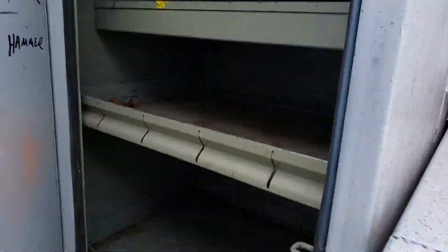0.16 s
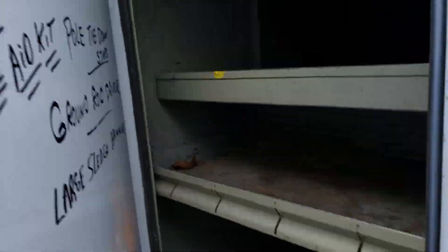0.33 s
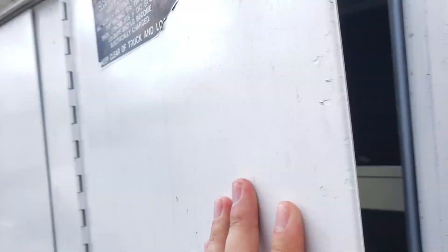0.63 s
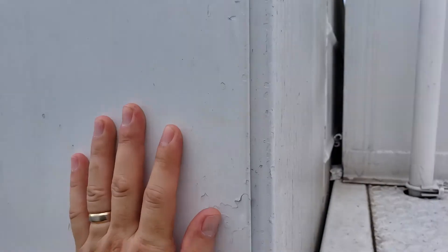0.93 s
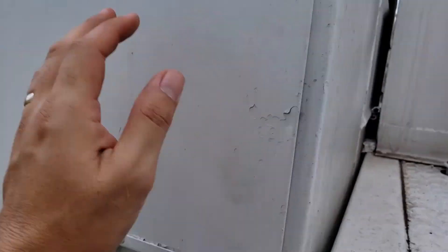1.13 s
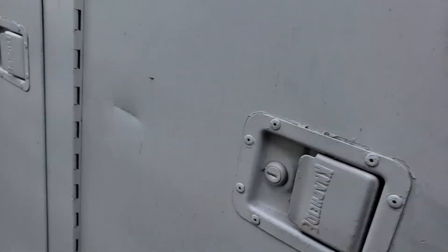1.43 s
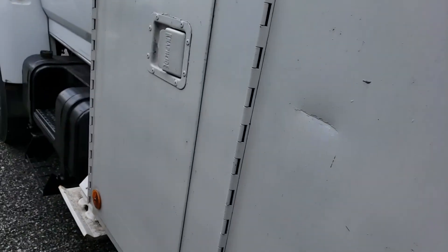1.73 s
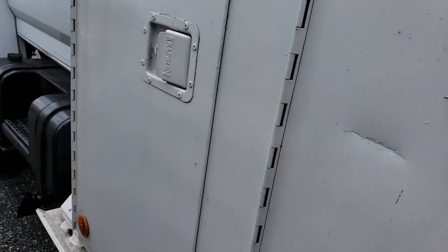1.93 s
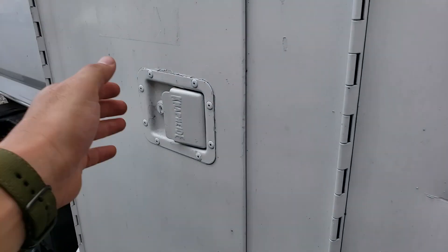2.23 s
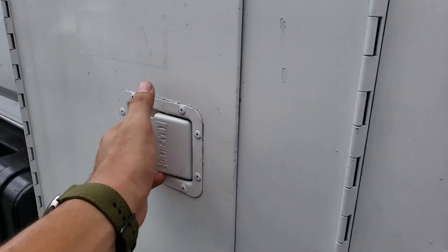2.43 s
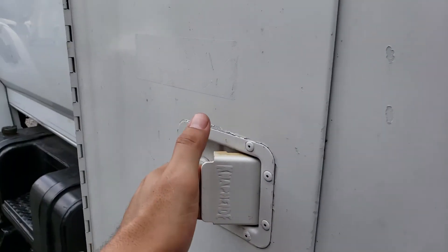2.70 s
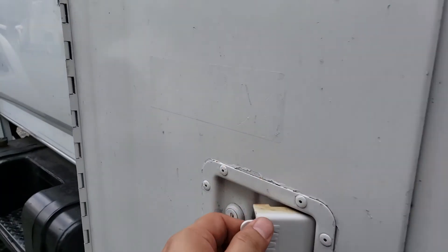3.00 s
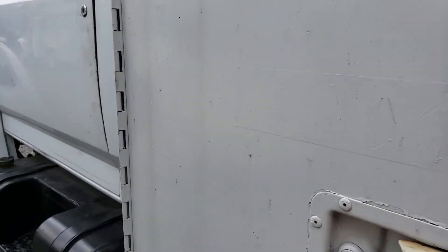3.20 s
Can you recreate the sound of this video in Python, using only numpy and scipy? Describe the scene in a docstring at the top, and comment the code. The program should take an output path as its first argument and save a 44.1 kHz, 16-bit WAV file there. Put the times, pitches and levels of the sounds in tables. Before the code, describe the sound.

Metal door on a service truck creaks shut with a hard clattering slam, followed by handle clicks

```python
"""An engine idles some way off as a steel compartment door on a service truck is pushed shut in an open yard.
Its long hinge groans and scrapes (stick-slip tones, slip noise), the panel drones (resonated noise), the latch
bolt squeaks onto the striker (jittered tones) and the door slams with a rattle (decaying noise bands, modes).
A hand slides off the paint (shaped noise), then ticks, works and taps the paddle handle of the next door, whose
bolt grates (resonated slips) and whose latch snaps free (strikes, decaying modes)."""
import sys
import numpy as np
from scipy import signal
from scipy.fft import rfft, irfft
from scipy.io import wavfile

SR = 44100
rng = np.random.default_rng(int(sys.argv[2]) if len(sys.argv) > 2 else 0)


def dump(signal):
    """Clip the signal to [-1, 1] and save it as 16-bit WAV at the path in sys.argv[1]."""
    limited = np.clip(np.atleast_2d(signal).T, -1, 1)
    pcm = np.round(limited * 32767).astype(np.int16)
    wavfile.write(sys.argv[1], SR, pcm)


N = 147735
T = np.arange(N) / SR
TAU = 2 * np.pi

# ring of the latch steel: (frequency [Hz], relative density [dB per Hz], t60 [s])
CLASH_RING = [(1300, -9.5, 0.35), (2580, -7.5, 0.22), (5800, -4.5, .14), (8200, -9.5, 0.087),
              (12000, -3.5, 0.089)]


def from_db(db):
    """Decibels to gain."""
    return 10 ** (np.asarray(db) / 20)


def rms_one(x):
    """Scale to rms 1."""
    return x / np.sqrt(np.mean(x ** 2) + 1e-20)


def in_time(rows, axis=1):
    """One column of a curve at every sample."""
    rows = np.array(rows)
    return np.interp(T, rows[:, 0], rows[:, axis])


def level(rows, axis=1):
    """Gain along a dB curve, falling at 500 dB/s outside it."""
    times_s = [row[0] for row in rows]
    outside_s = np.abs(T - np.clip(T, min(times_s), max(times_s)))
    return from_db(np.maximum(in_time(rows, axis=axis) - 500 * outside_s, -200))


def at_hz(rows, hz, axis=1):
    """One column of a spectrum, interpolated over log frequency."""
    rows = np.array(rows)
    return np.interp(np.log(hz + 1e-9), np.log(rows[:, 0]), rows[:, axis])


def drift(rate_hz):
    """Slow random wander of rms 1: white noise through a double one-pole low-pass."""
    r = np.exp(-TAU * rate_hz / SR)
    white = rng.standard_normal(N + SR)
    settled = signal.lfilter([1], [1, -2 * r, r * r], white)[SR:]
    return rms_one(settled)


def wavering(hz, jitter, rate_hz):
    """Phase of a vibration whose pitch wanders by a share of itself."""
    return TAU * np.cumsum(hz + hz * jitter * drift(rate_hz)) / SR


def noise_pair():
    """Two unrelated white noises."""
    return rng.standard_normal((2, N))


def spread(pair):
    """Two unrelated signals become left and right, alike in the bass and unlike in the treble."""
    # stereo image: (frequency [Hz], likeness of left and right, left minus right [dB])
    stereo_image = [(270, 0.9, 0), (1129, 0, 2.5), (2600, 0.079, -3.5)]
    size = pair.shape[1]
    hz = np.arange(size // 2 + 1) * SR / size
    sides = np.array([[1], [-1]])
    alike = np.clip(at_hz(stereo_image, hz), -1, 1)
    mid, side = rfft(pair)
    left_right = np.sqrt(1 + alike) * mid + np.sqrt(1 - alike) * side * sides
    balance = from_db(sides * at_hz(stereo_image, hz, axis=2) / 2)
    return irfft(left_right * balance, size)


def coloured(pair, colour):
    """Shape a steady excitation, falling away below its first point; stereo, rms 1."""
    hz = np.arange(N // 2 + 1) * SR / N
    low_cut = np.minimum(hz / colour[0][0], 1) ** 2
    shaped = irfft(rfft(pair) * from_db(at_hz(colour, hz)) * low_cut, N)
    return rms_one(spread(shaped))


def resonate(x, modes):
    """Parallel two-pole resonances; white noise of rms 1 leaves each at its dB."""
    out = 0
    for hz, width_hz, db in modes:
        r = np.exp(-np.pi * width_hz / SR)
        poles = [1, -2 * r * np.cos(TAU * hz / SR), r * r]
        gain = from_db(db) * np.sqrt((1 - r * r) / 2)
        out = out + gain * signal.lfilter([1, 0, -1], poles, x + 1e-18)
    return out


def slips():
    """Dense tiny slips of uneven size, in two channels of unrelated sizes."""
    slips_per_s = 2200
    return rms_one(noise_pair() * (rng.random(N) < slips_per_s / SR))


def strike(s, db, ring, crack_db=0):
    """A blow on steel: crowded modes, as third-octave noise bands that each die at their own rate."""
    crack_t60_s = 0.029
    t = T[:SR * 3 // 4]
    lowest_hz = ring[0][0]
    centres_hz = 31.25 * 2 ** (np.arange(27) / 3)
    centres_hz = centres_hz[centres_hz > lowest_hz / 2]
    low_cut = np.minimum(centres_hz / lowest_hz, 1) ** 2
    # density times root bandwidth
    gains = from_db(at_hz(ring, centres_hz)) * np.sqrt(centres_hz) * low_cut
    gains = rms_one(gains) / np.sqrt(len(centres_hz))
    # two noises, used by alternate bands
    white = spread(rng.standard_normal((2, 2 * len(t)))).reshape(2, 2, -1)
    out = 0
    for k, (hz, gain) in enumerate(zip(centres_hz, gains)):
        sos = signal.butter(2, [hz * .89, hz * 1.12], "band", fs=SR, output="sos")
        band = rms_one(signal.sosfilt(sos, white[:, k % 2]))
        out = out + gain * band * from_db(-60 * t / at_hz(ring, hz, axis=2))
    # the first instant stands crack_db above the ring
    out = out * (1 + (from_db(crack_db) - 1) * from_db(-60 * t / crack_t60_s))
    return from_db(db - crack_db) * np.pad(out, ((0, 0), (int(s * SR), N)))[:, :N]


def ring_modes(hits, modes):
    """Each hit sets the clear modes of a part ringing; they swell over about one cycle."""
    out = np.zeros((2, N))
    for s, db in hits:
        t = T[T >= s] - s
        for hz, mode_db, t60_s in modes:
            swell = -np.expm1(-hz * t)
            fade = from_db(db + mode_db - 60 * t / t60_s) * swell
            out[:, T >= s] += fade * np.sin(TAU * (hz * t + rng.random((2, 1))))
    return spread(out) / np.sqrt(2)


def engine_hum():
    """Low sines of an idling engine, wavering in pitch."""
    # (frequency [Hz], relative level [dB])
    engine_lines = [(55.5, 1), (108, 1.5)]
    return sum(from_db(db) * np.sin(wavering(hz, 0.0379, 7.85)) for hz, db in engine_lines)


def yard():
    """Outdoor rumble as shaped noise, with the engine hum following its level."""
    # (frequency [Hz], relative level [dB])
    yard_colour = [(50, -1), (110, -4.5), (300, -18), (1200, -36.5), (2100, -36.5), (6000, -48),
                   (16000, -55)]
    # (time [s], level [dB])
    yard_level = [(1.9, -43), (2.85, -40.5), (3.2, -35.5)]
    rumble = coloured(noise_pair(), yard_colour)
    return from_db(in_time(yard_level)) * (rumble + from_db(-2.5) * engine_hum())


def panel_drone():
    """The swinging panel drones: noise through its resonances."""
    # (time [s], level [dB])
    drone_level = [(0, -34.5), (.35, -23.5), (.62, -35.5), (.8, -25.5)]
    # (frequency [Hz], width [Hz], relative level [dB])
    drone_modes = [(62.6, 27, 8.2), (111, 67, 15), (238.5, 18, 8.3)]
    return level(drone_level) * rms_one(spread(resonate(noise_pair(), drone_modes)))


def hinge_scrape():
    """Dry friction in the hinge: tiny slips, heard directly and through the ring of steel."""
    # (time [s], level [dB])
    scrape_level = [(0, -42.5), (.245, -45), (.265, -19), (.312, -23), (.365, -28.5), (.452, -18.5),
                    (.49, -22), (.535, -36), (.62, -56), (.76, -46)]
    # (frequency [Hz], relative level [dB])
    scrape_colour = [(600, 10), (1700, -8.5), (3000, 2.5), (4200, -7), (7500, -1), (9500, -7),
                     (13500, -3.5), (16000, -7)]
    grind = slips()
    ringing = signal.fftconvolve(grind, strike(0, 0, CLASH_RING), axes=1)[:, :N]
    return level(scrape_level) * coloured(grind + rms_one(ringing), scrape_colour)


def hinge_groan():
    """Two knuckles of the hinge stick and slip at unsteady rates; the lower beats against the other."""
    # stick-slip rate: (time [s], frequency [Hz])
    groan_pitch = [(.31, 250), (.4, 259.7), (.54, 267.3)]
    # (time [s], fundamental level [dB], overtone level [dB])
    groan_level = [(.235, -23.5, -63), (.305, -12, -22), (.355, -17.5, -31), (.425, -25, -24.5),
                   (.495, -13, -26), (.548, -20.5, -36), (.585, -39.5, -35.5)]
    # multiples 2 to 5: relative level [dB]
    overtones_db = [1.5, -11.5, -18, -17]
    # second knuckle: (time [s], level [dB])
    judder_level = [(.21, -47), (.268, -16), (.335, -37), (.39, -11), (.435, -24.5), (.53, -26.5)]
    jitter, flutter_db = 0.025, 3
    judder_hz, judder_octave_db = 233, -7

    phase = wavering(in_time(groan_pitch), jitter, 100)
    low = level(groan_level) * np.sin(phase)
    high = 0
    for k, db in enumerate(overtones_db, 2):
        gain = from_db(db + flutter_db * drift(48))
        high = high + gain * np.sin(k * phase + TAU * rng.random())
    second = wavering(judder_hz, jitter, 92)
    octave_gain = from_db(judder_octave_db + flutter_db * drift(35))
    judder = level(judder_level) * (np.sin(second) + octave_gain * np.sin(2 * second))
    return np.sqrt(2) * (low + level(groan_level, axis=2) * high + judder)


def squeaks():
    """Steel rubs on steel at hinge, striker and handle; overtones grow with the level."""
    # (start [s], length [s], frequency [Hz], fundamental level [dB])
    squeak_events = [(-0.02, .23, 2150, -46.5), (0.195, .08, 1094, -36.5), (0.688, 0.035, 3260, -40),
                     (0.708, 0.05, 3760, -39), (0.74, 0.021, 3864, -33), (2.859, 0.027, 4090, -58)]
    harsh_db = -31.5  # level at which overtones match the fundamental
    out = 0
    for s, length_s, hz, db in squeak_events:
        progress = (np.clip(T, s, s + length_s) - s) / length_s
        gain = from_db(db) * np.sqrt(np.abs(np.sin(np.pi * progress)))
        phase = np.array([wavering(hz, .025, 400) for _ in range(2)])
        harshness = np.minimum(gain / from_db(harsh_db), 1) ** 2
        overtones = harshness * (np.sin(2 * phase) + np.sin(3 * phase))
        out = out + gain * (np.sin(phase) + overtones)
    return spread(out)


def slam():
    """Latch and door edge hit the frame in a quick run of contacts."""
    # (time [s], clash level [dB], body level [dB])
    contacts = [(0.7607, -16, -24), (0.767, -22, -12), (0.7757, -16.5, -11), (.789, -19.5, -15.5),
                (.802, -16, -13.5)]
    # hollow door: (frequency [Hz], relative density [dB per Hz], t60 [s])
    body_ring = [(50, 8, 0.34), (130, 10, 0.32), (520, -5.5, 0.39), (1630, -4.5, 0.18), (2660, -30.5, 0.27)]
    out = 0
    for s, clash_db, body_db in contacts:
        out = out + strike(s, clash_db, CLASH_RING) + strike(s, body_db, body_ring)
    return out


def panel_booms():
    """A panel's modes boom as it hits the frame, rebounds, is unlatched and springs off its seal."""
    # (time [s], level [dB])
    booms = [(.772, -12), (.81, -10), (2.92, -27.5), (2.968, -32.5)]
    # (frequency [Hz], relative level [dB], t60 [s])
    panel_modes = [(102, 5.5, 0.067), (168.8, -7, 0.39), (264.5, 0.5, 0.19), (473.6, -10, 0.24),
                   (1580, -27, .15)]
    return ring_modes(booms, panel_modes)


def palm():
    """Skin hisses softly over painted steel: shaped noise."""
    # (time [s], level [dB])
    palm_level = [(.95, -64), (1.36, -53.5), (1.7, -68)]
    # (frequency [Hz], relative level [dB])
    palm_colour = [(5200, 7.5), (8500, 0), (12000, 4.5), (16000, -4)]
    return level(palm_level) * coloured(noise_pair(), palm_colour)


def finger_ticks():
    """Fingers tick on the paddle, faint and bright."""
    # (time [s], level [dB])
    tick_events = [(1.844, -47), (1.862, -50)]
    # (frequency [Hz], relative density [dB per Hz], t60 [s])
    tick_ring = [(12540, 0, 0.037)]
    return sum(strike(s, db, tick_ring) for s, db in tick_events)


def handle_clicks():
    """The paddle handle and its latch click, and the door under them knocks."""
    # (time [s], click onset level [dB], knock onset level [dB])
    handle_events = [(2.389, -48, -27.5), (2.43, -37, -28), (2.48, -49, -17.5), (2.523, -34.5, -31.5),
                     (2.917, -19, -23)]
    # handle: (frequency [Hz], relative density [dB per Hz], t60 [s])
    click_ring = [(2920, -0.5, 0.19), (4040, -6, 0.12), (14700, -15, 0.043)]
    # door under it: (frequency [Hz], relative density [dB per Hz], t60 [s])
    knock_ring = [(199.9, 7.5, 0.49), (635, -1.5, 0.14), (1130, -5, 0.27), (3920, -29, 0.3)]
    crack_db = 11.5
    out = 0
    for s, click_db, knock_db in handle_events:
        out = out + strike(s, click_db, click_ring, crack_db=crack_db)
        out = out + strike(s, knock_db, knock_ring, crack_db=crack_db)
    return out


def bolt():
    """The sprung bolt grates back: slips excite its resonances."""
    # (time [s], drive level [dB])
    bolt_level = [(2.482, -41), (2.496, -28), (2.508, -26.5), (2.535, -71)]
    # (frequency [Hz], width [Hz], relative level [dB])
    bolt_modes = [(2785, 20, -7), (3890, 15, -5), (4030, 1500, -7), (6620, 220, -10.5), (7470, 360, -8.5),
                  (10480, 220, -8.5)]
    drive = slips() * level(bolt_level) * (T > bolt_level[0][0])
    return spread(resonate(drive, bolt_modes)) / 2


def latch():
    """The latch hits its stop, then snaps free, ringing in its modes."""
    # (time [s], level [dB])
    latch_hits = [(2.521, -33.5), (2.9172, -25.5)]
    # (frequency [Hz], relative level [dB], t60 [s])
    latch_modes = [(1140, -11.5, 0.15), (2197, -9, 0.14), (2850, 4.5, 0.038), (5450, 0.5, 0.018)]
    return ring_modes(latch_hits, latch_modes)


def finger_taps():
    """A fingertip taps the handle, which rings dull and short."""
    # (time [s], level [dB])
    tap_events = [(2.6505, -27), (2.756, -37.5)]
    # (frequency [Hz], relative level [dB], t60 [s])
    tap_modes = [(1060, 8, 0.0067), (1370, -1.5, 0.01)]
    return ring_modes(tap_events, tap_modes)


def scene():
    """All sources together."""
    closing = panel_drone() + hinge_scrape() + hinge_groan() + squeaks() + slam()
    opening = finger_ticks() + handle_clicks() + bolt() + latch() + finger_taps()
    return yard() + closing + panel_booms() + palm() + opening


def record(dry):
    """Clip peaks under full scale, then low-pass steeply."""
    cutoff_hz = 15600
    sos = signal.ellip(10, .1, 90, cutoff_hz, fs=SR, output="sos")
    return signal.sosfilt(sos, np.clip(dry, -.85, .85))


dry = scene()
out = record(dry)
dump(out)
```